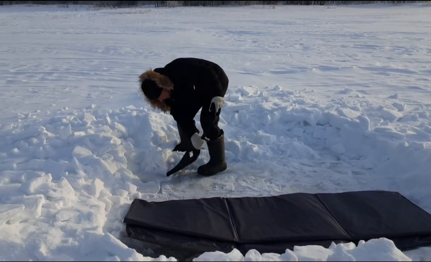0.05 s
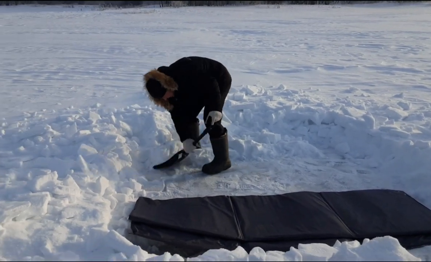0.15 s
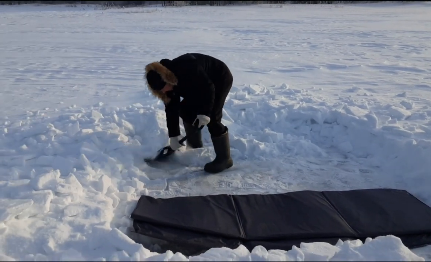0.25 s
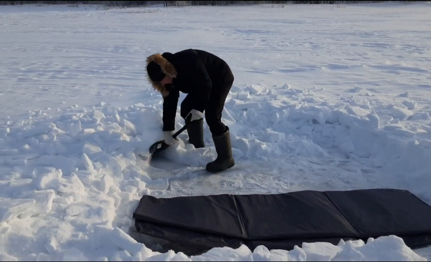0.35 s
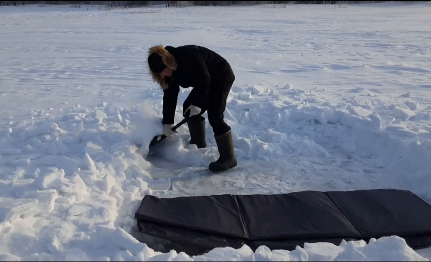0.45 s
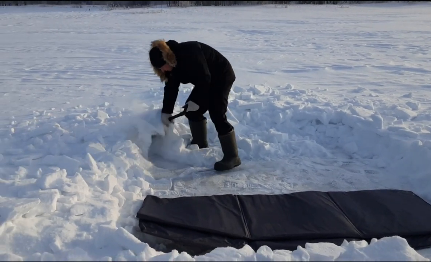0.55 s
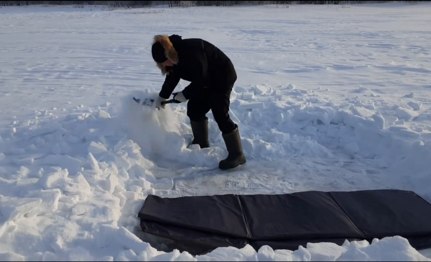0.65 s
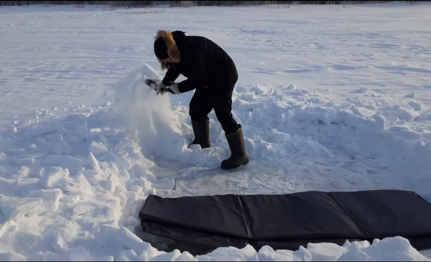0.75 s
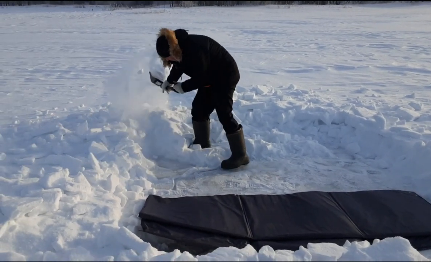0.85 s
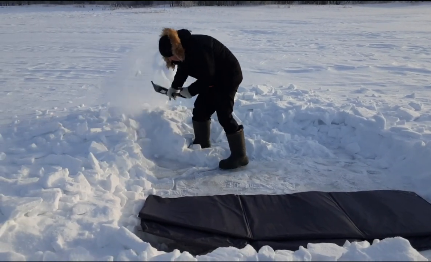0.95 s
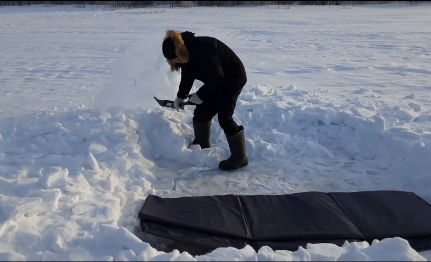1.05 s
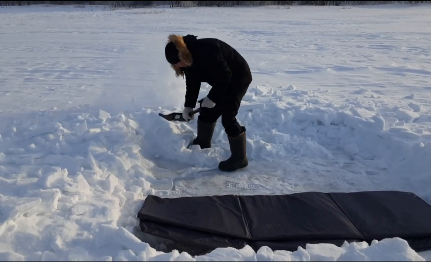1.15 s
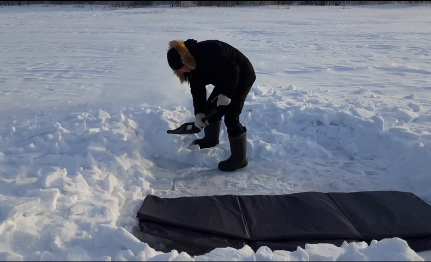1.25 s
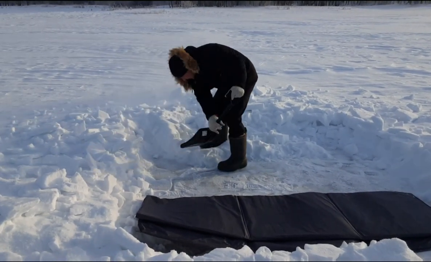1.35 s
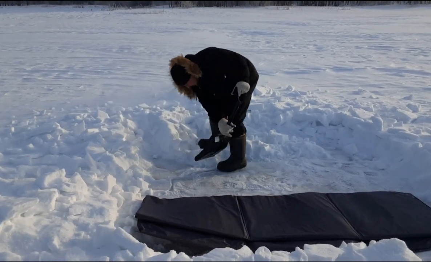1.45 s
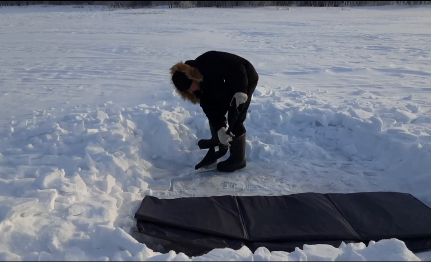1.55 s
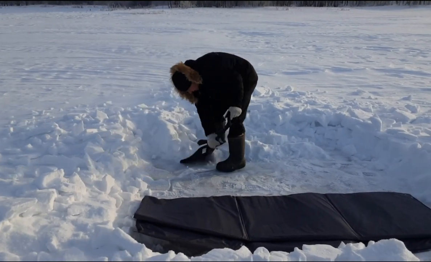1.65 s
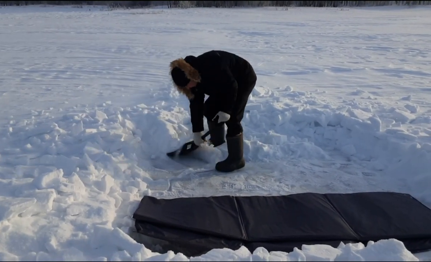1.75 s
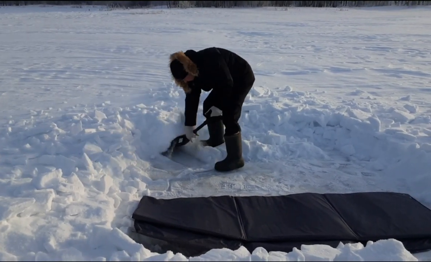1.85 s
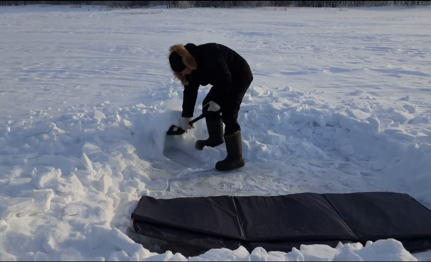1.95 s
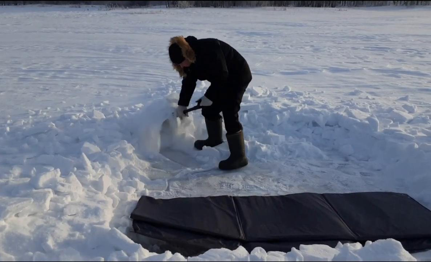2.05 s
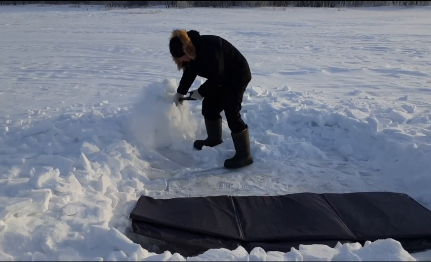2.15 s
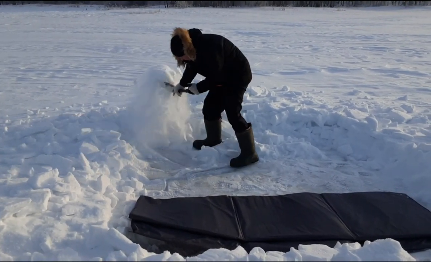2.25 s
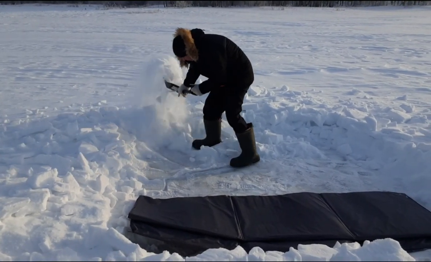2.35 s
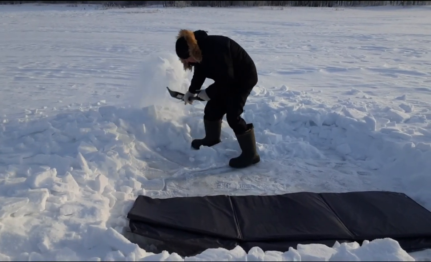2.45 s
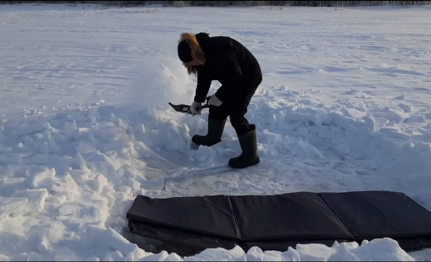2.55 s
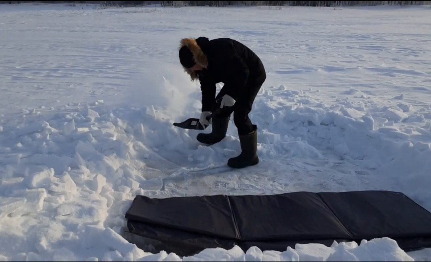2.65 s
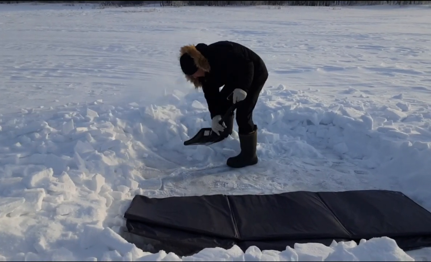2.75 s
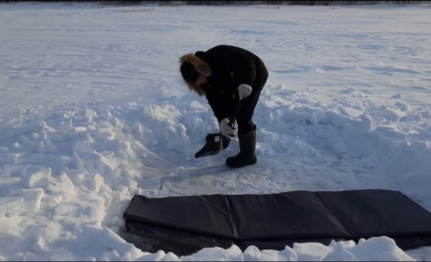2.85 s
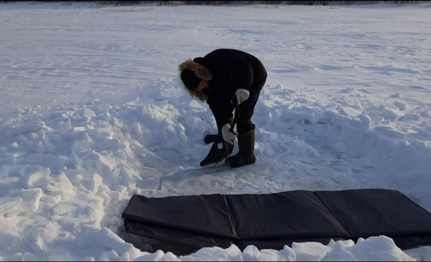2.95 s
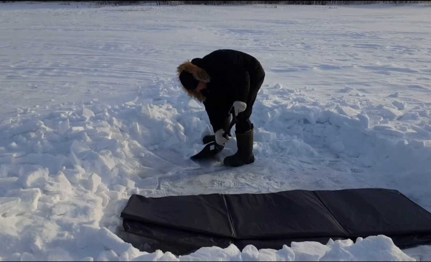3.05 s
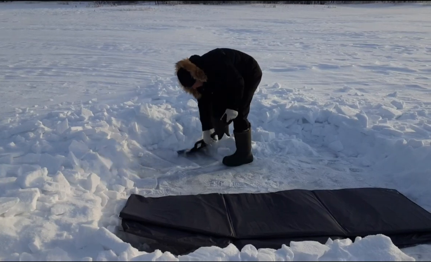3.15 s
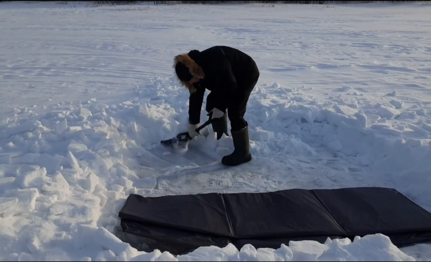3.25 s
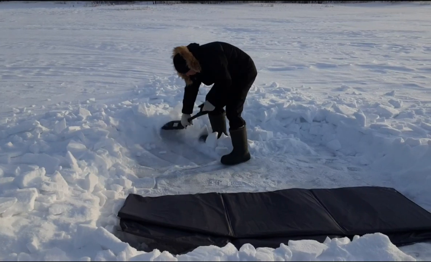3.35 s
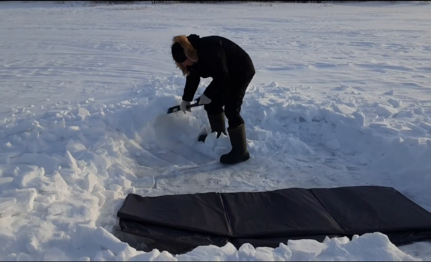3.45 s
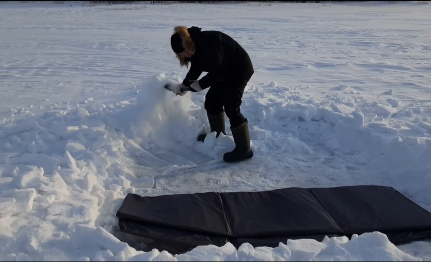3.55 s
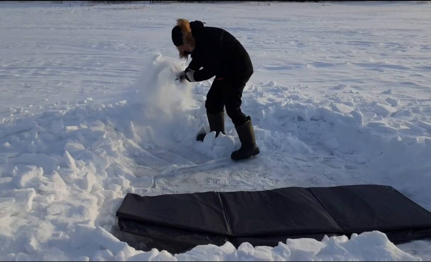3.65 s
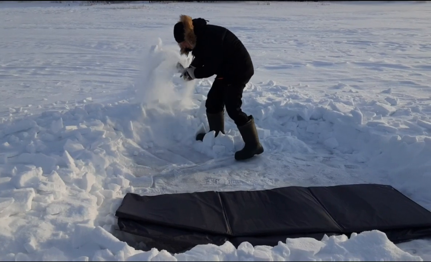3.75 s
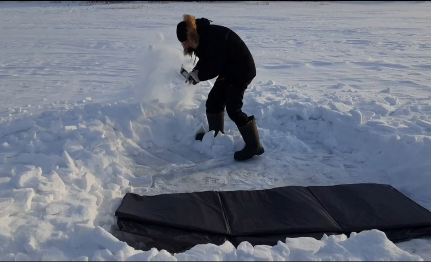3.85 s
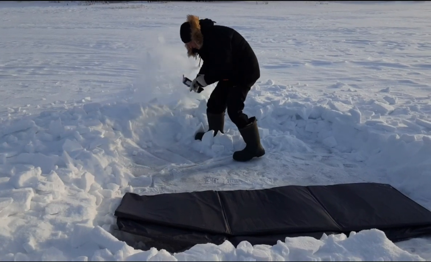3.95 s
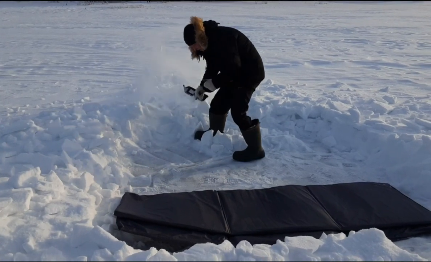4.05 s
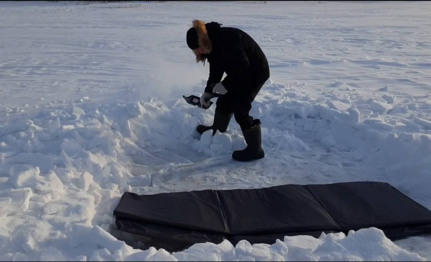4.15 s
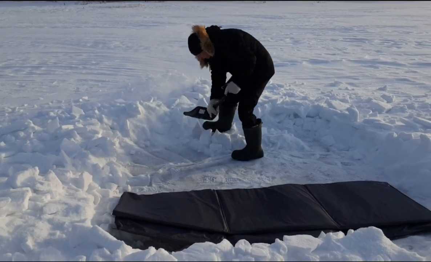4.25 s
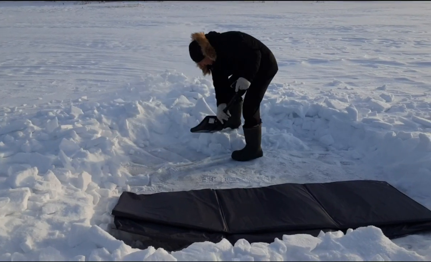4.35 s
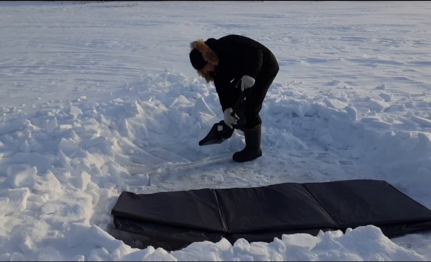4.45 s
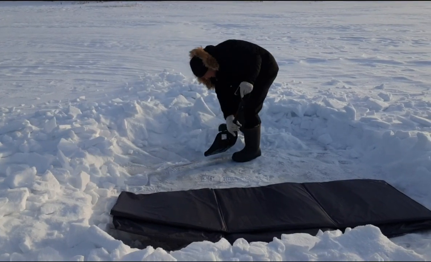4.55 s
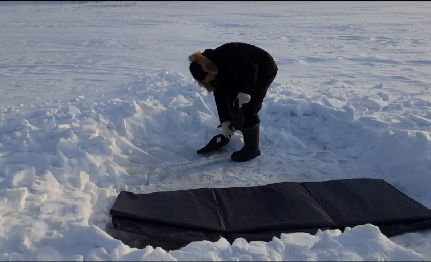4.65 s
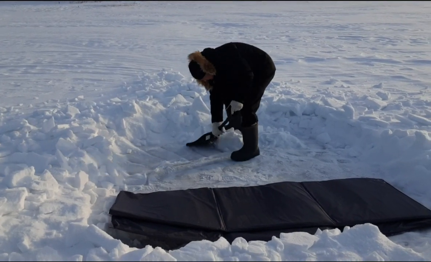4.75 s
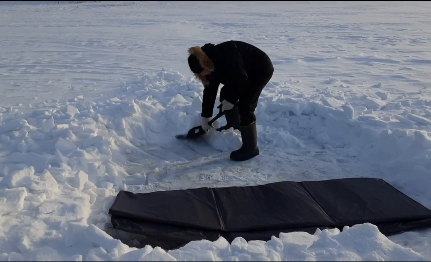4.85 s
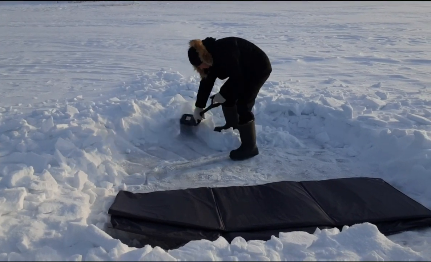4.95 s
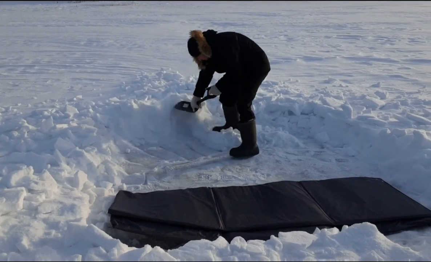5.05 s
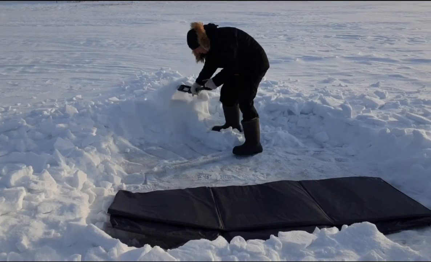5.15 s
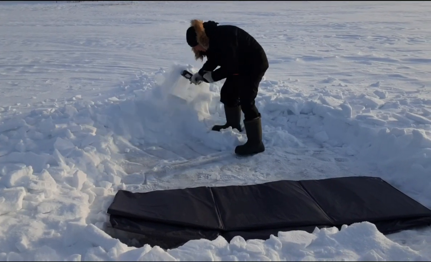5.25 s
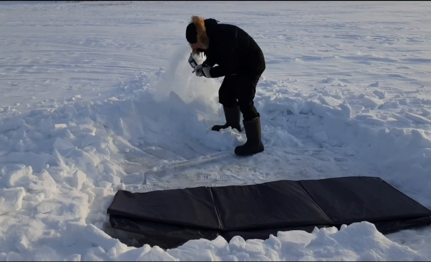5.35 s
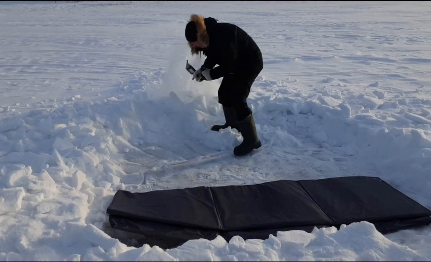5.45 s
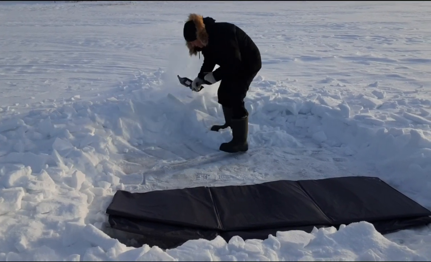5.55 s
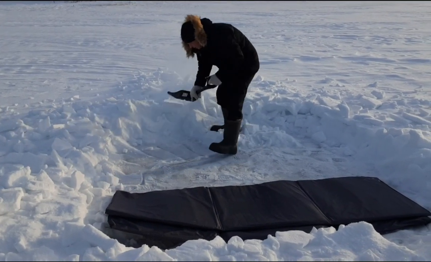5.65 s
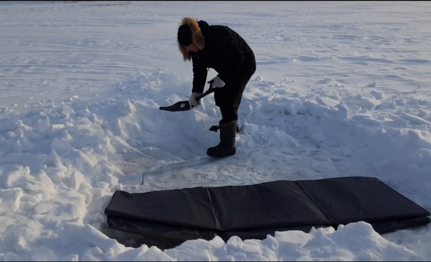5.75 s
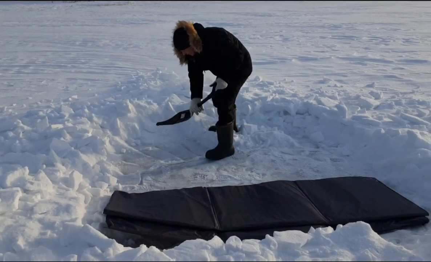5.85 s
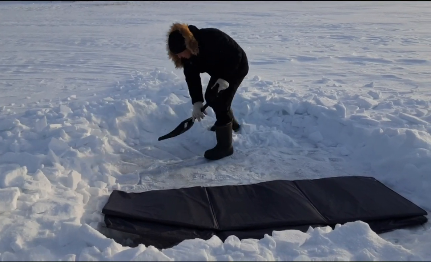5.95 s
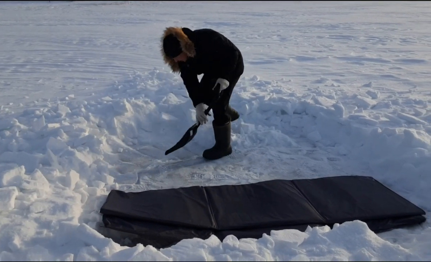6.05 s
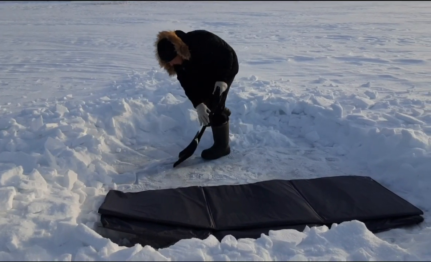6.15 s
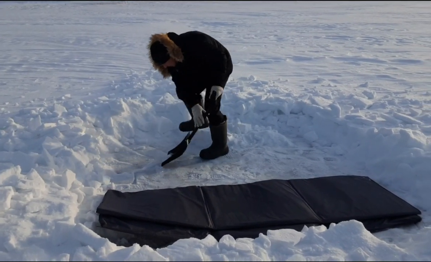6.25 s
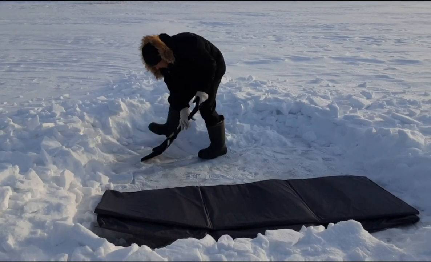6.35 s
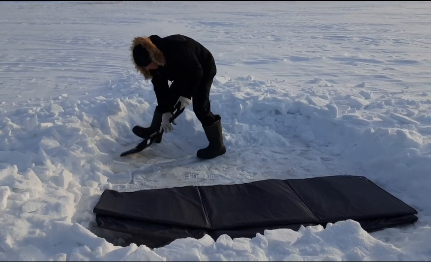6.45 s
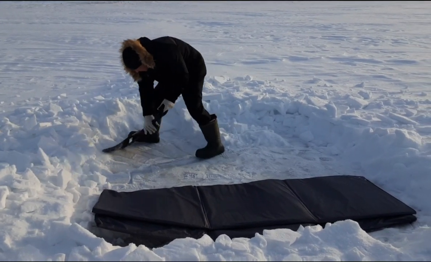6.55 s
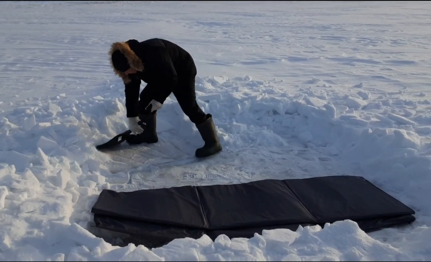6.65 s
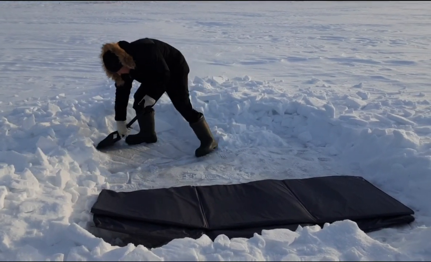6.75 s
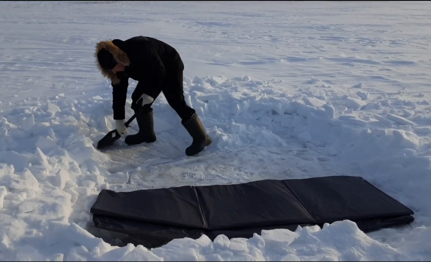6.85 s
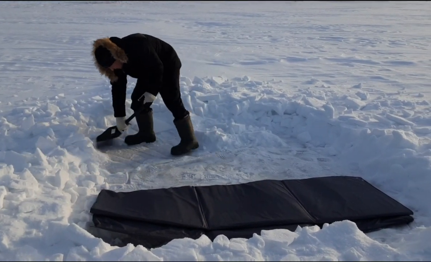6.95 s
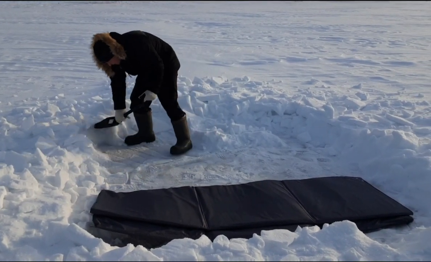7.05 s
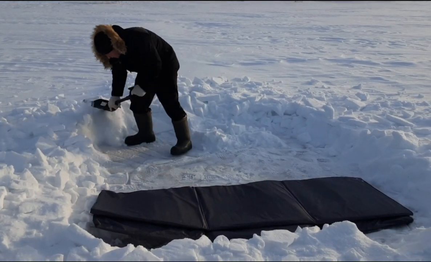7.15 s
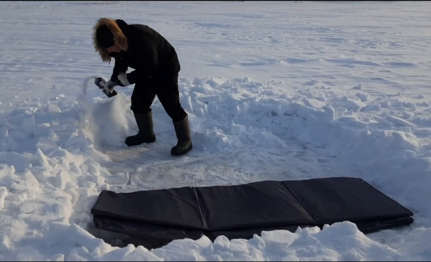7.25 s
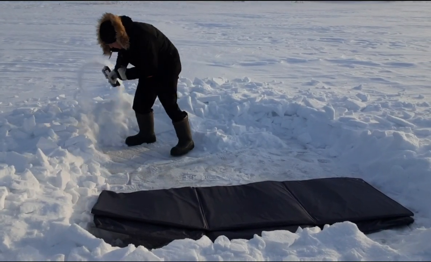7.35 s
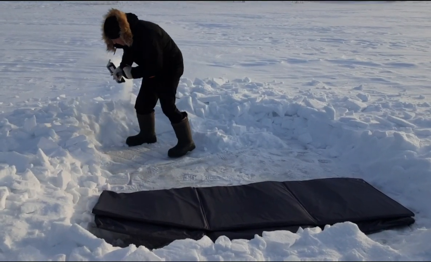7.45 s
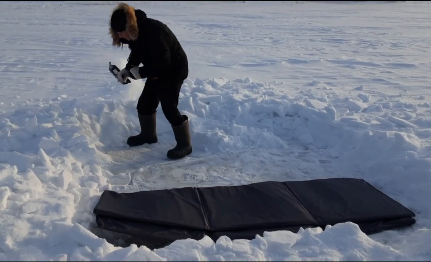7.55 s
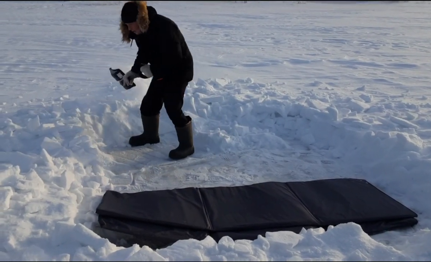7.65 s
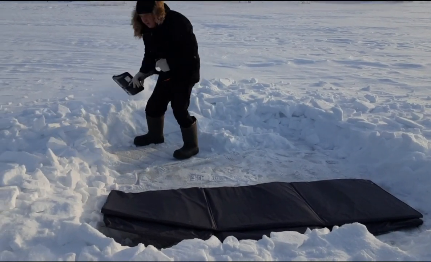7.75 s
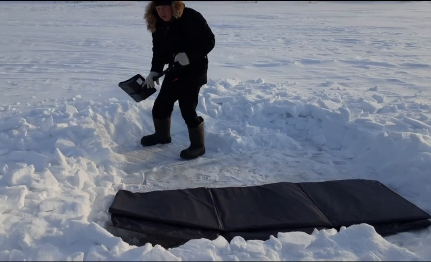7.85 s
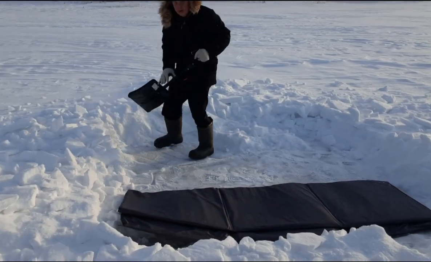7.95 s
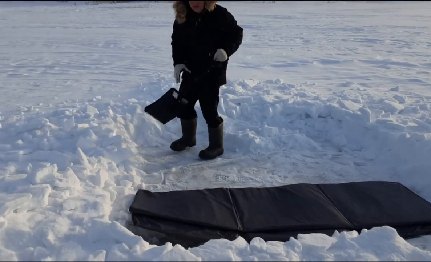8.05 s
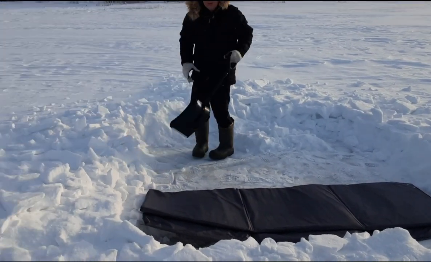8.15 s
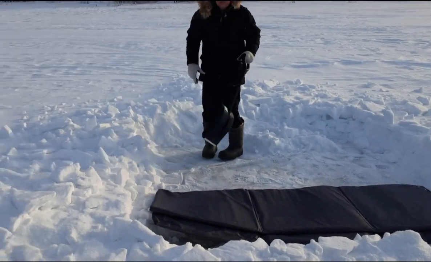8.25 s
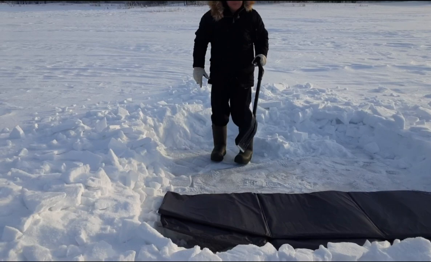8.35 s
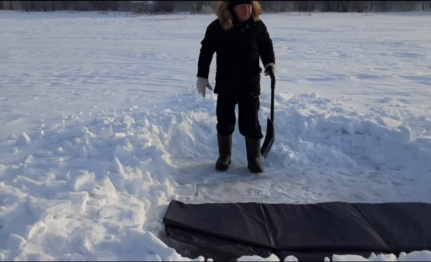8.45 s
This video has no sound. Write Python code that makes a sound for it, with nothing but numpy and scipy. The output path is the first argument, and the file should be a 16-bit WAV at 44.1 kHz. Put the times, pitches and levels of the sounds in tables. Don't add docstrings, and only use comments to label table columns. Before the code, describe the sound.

Outdoors on a snowy frozen lake, a short shovel makes five gritty scraping pushes over packed snow and ice, about one every second and a half. Between them, thrown snow hisses and lands in soft clumps while boots crunch. The last push is longest, starting with loud hard knocks, ringing brighter on bare ice and ending in small squeaks. Quiet crunches follow. One dry microphone, no echo.

```python
import sys
import numpy as np
from scipy import signal
from scipy.fft import rfft, irfft
from scipy.io import wavfile

SR = 44100
rng = np.random.default_rng(int(sys.argv[2]) if len(sys.argv) > 2 else 0)


def bounce(signal):
    frames = np.transpose(np.atleast_2d(signal))
    limited = np.clip(frames, -1, 1)
    pcm = np.round(limited * 32767).astype(np.int16)
    wavfile.write(sys.argv[1], SR, pcm)


def voltage_ratio(decibels):
    exponent = np.asarray(decibels, float) / 20
    return 10 ** exponent


N = 374409

# (time [s], edge pressure [dB], slide speed as spray re pressure [dB])
LOADED_STROKES = [
    [(0.0, -21.5, -3.5), (0.01, -26.5, -3.5), (0.092, -22, -5), (0.165, -29.5, -5.5), (0.246, -33.5, -3),
     (0.262, -30, -4.5), (0.362, -44.5, -3.5), (0.392, -42.5, -0.5), (0.47, -48.5, -5)],
    [(1.433, -49, 1), (1.448, -36.5, 0.5), (1.477, -31, -1), (1.505, -25, -4), (1.619, -28.5, -6),
     (1.635, -33, -0.5), (1.747, -31.5, -7.5), (1.783, -38, -0.5), (1.85, -42.5, -6)],
    [(2.859, -40, 1), (2.872, -25.5, -2.5), (2.89, -33, 0.5), (2.932, -27, -1.5), (2.99, -23.5, -7.5),
     (3.07, -30.5, -5.5), (3.085, -32.5, -6)],
    [(3.085, -38, -6), (3.096, -29.5, -1.5), (3.118, -28.5, -10), (3.13, -32, -3), (3.144, -32.5, -5.5),
     (3.208, -37, 1.5), (3.215, -40, -2), (3.25, -44, -2)],
    [(4.4645, -43, 5), (4.476, -37, 4), (4.482, -22.5, -2.5), (4.516, -32.5, -2), (4.58, -23, -7.5),
     (4.6, -24.5, -3), (4.626, -18.5, -12.5), (4.64, -34, -1)],
    [(4.64, -31, 2.5), (4.684, -31, -1), (4.778, -40.5, -0.5), (4.825, -42, -1.5), (4.84, -38, 2.5),
     (4.9, -41.5, 1.5), (4.94, -37.5, 4.5), (4.98, -46.5, 0)],
]
# (time [s], edge pressure [dB], slide speed as spray re pressure [dB])
BARE_STROKES = [
    [(6.034, -28.5, -14), (6.056, -32.5, -17), (6.07, -39, -11), (6.11, -31, -14), (6.122, -31.5, -8),
     (6.148, -29, -20), (6.214, -36, -4.5), (6.25, -25.5, -10), (6.264, -32, -16)],
    [(6.264, -29, -13), (6.306, -28, -10), (6.412, -28, -9), (6.43, -32, -5), (6.488, -29.5, 0),
     (6.55, -30.5, -5), (6.58, -25.5, -6.5), (6.606, -36.5, -1), (6.63, -33.5, -7)],
    [(6.63, -45, -5), (6.648, -36, -8), (6.72, -37.5, -8), (6.758, -47, -2), (6.856, -39, 1),
     (6.894, -40, -1), (6.924, -34, -6), (6.942, -46.5, 5.5), (7.004, -50, 3.5)],
]
# (shaft and ice boom at full pressure [dB], low blade modes re ring [dB])
GRIPS = [
    (-37.5, -5.5),
    (-37, -2.5),
    (-36, -2.5),
    (-38.5, -2),
    (-31, -2),
    (-33, -1.5),
    (-36, -2),
    (-35, -1),
    (-37.5, -1.5),
]
# (time [s], upper mode pitch ratio [1], low mode pitch ratio [1])
FLEX = [
    (0.0, 0.98, 1.026),
    (6.029, 1.01, 1.023),
    (6.13, 0.97, 1.086),
    (6.22, 1.02, 0.91),
    (6.339, 0.94, 0.93),
    (6.44, 1.06, 0.93),
    (6.51, 0.98, 0.99),
    (6.6, 0.97, 0.89),
    (7.0, 1.02, 1.01),
]
# (frequency [Hz], width [Hz], level [dB])
LOADED_MODES = [(504, 168, -1.5), (603, 313, -2), (880, 200, -0.5), (1050, 223, -4.5), (1238, 210, -4),
                (1540, 245, -3), (1830, 155, -2), (2414, 280, -4.5), (3020, 264, -7.5), (3410, 500, -17)]
# (frequency [Hz], width [Hz], level [dB])
BARE_MODES = [(620, 270, -7), (836, 190, -3.5), (1040, 200, -0.5), (1510, 280, 2), (2440, 194, 3.5),
              (3060, 920, -9)]
# (frequency [Hz], density [dB per Hz])
LOADED_SPRAY = [(2060, -35), (3500, -3), (3970, -7), (4440, -1.5), (5040, -9), (5470, -5), (6200, -5.5),
                (6730, -0.5), (7340, -2), (9500, -1.5), (11100, -16.5), (15700, -14)]
# (frequency [Hz], density [dB per Hz])
BARE_SPRAY = [(1940, -14), (3300, -1), (3640, -8), (3940, -14), (4630, -2), (5140, -18), (6420, -6),
              (7040, -6.5), (9560, 1), (11000, -13.5), (12600, -10), (15700, -16)]
# (frequency [Hz], density [dB per Hz])
BOOM = [(30, -29), (57, -12.5), (107, -6.5), (200, 2.5), (312, -5), (347, -8.5), (500, -7), (650, -43),
        (1100, -120)]
HISS_PARTS_HZ = [1500, 5100, 7200, 10600, 17000]
# (time [s], pitch [Hz], level [dB])
SQUEAKS = [
    [(6.631, 1122, -36), (6.636, 1195, -25), (6.65, 1226, -25), (6.67, 1370, -32), (6.695, 1266, -29),
     (6.722, 1140, -45), (6.735, 961, -51)],
    [(6.858, 747, -31), (6.864, 880, -30), (6.875, 1008, -32), (6.892, 1092, -41), (6.908, 1274, -37),
     (6.915, 1664, -32), (6.93, 1809, -36)],
]
# (time [s], peak [dB])
KNOCKS = [
    (2.866, -27),
    (4.476, -21),
    (4.621, -12),
    (6.036, -9.5),
    (6.042, -3),
    (6.251, -8),
    (6.297, -4.5),
    (7.024, -24),
]
# (frequency [Hz], level [dB], t60 [s])
KNOCK_MODES = [(505, -12.5, 0.072), (1050, 8, 0.024), (1600, -7, 0.043), (2276, -12, 0.063)]
# (start [s], attack [s], hold [s], release [s], crunch [dB])
CRUNCHES = [(0.49, 0.045, 0.21, 0.17, -51.5), (0.915, 0.032, 0.03, 0.03, -39),
            (0.94, 0.04, 0.053, 0.039, -36), (1.06, .01, 0.064, 0.36, -51), (1.3, 0.016, 0.13, 0.15, -57.5),
            (1.84, 0.058, 0.12, 0.07, -44), (2.05, 0.014, 0.054, 0.26, -45), (2.29, .008, .06, .03, -45),
            (2.3, 0.068, 0.067, 0.033, -36.5), (2.45, .005, 0.051, .05, -52.5),
            (2.5, 0.023, 0.094, 0.17, -49.5), (2.69, .005, 0.18, .03, -57),
            (3.255, 0.0097, 0.088, 0.015, -47.5), (3.35, 0.013, 0.062, 0.028, -43.5),
            (3.44, 0.061, 0.071, 0.54, -49), (3.7, 0.16, 0.06, 0.08, -41), (4.0, .01, 0.13, .05, -58),
            (4.195, 0.0085, 0.17, 0.03, -45), (4.37, 0.0075, 0.039, 0.061, -59),
            (5.0, 0.025, 0.1, 0.011, -44), (5.13, 0.013, 0.16, 0.2, -54.5), (5.5, 0.037, 0.15, 0.18, -40.5),
            (7.02, 0.0078, 0.0084, 0.054, -35), (7.06, 0.016, 0.3, 0.15, -49.5),
            (7.35, 0.019, 0.042, 0.03, -44), (7.41, .01, 0.14, 0.26, -50.5),
            (8.018, 0.004, 0.011, 0.24, -49.5), (8.04, 0.011, 0.046, .02, -51),
            (8.128, 0.0044, 0.028, 0.18, -48), (8.21, .01, 0.12, 0.41, -55)]
# (start [s], attack [s], hold [s], release [s], hiss [dB])
POWDERS = [(0.46, 0.014, 0.045, 0.29, -53.5), (0.535, 0.05, 0.11, 0.1, -48),
           (0.68, 0.066, 0.0084, 0.014, -45), (0.76, .01, 0.092, 0.33, -60),
           (0.9, 0.15, 0.19, 0.018, -47.5), (1.25, 0.0054, 0.2, 0.56, -54.5),
           (1.85, 0.0092, 0.16, 0.17, -49.5), (2.06, 0.0056, 0.12, 0.42, -48.5),
           (2.3, 0.13, 0.02, 0.063, -47.5), (2.48, 0.02, 0.13, 0.098, -46.5), (2.52, 0.014, .01, .04, -45),
           (2.69, .004, 0.011, 0.042, -44.5), (2.738, 0.004, 0.01, 0.33, -51),
           (3.25, 0.0096, .01, 0.1, -37.5), (3.27, .01, .055, .012, -42), (3.3, 0.022, 0.34, 0.74, -49.5),
           (3.85, 0.068, 0.043, 0.34, -47), (4.195, 0.011, 0.032, 0.13, -48),
           (4.25, 0.055, 0.049, 0.044, -44.5), (4.96, 0.074, 0.036, 0.084, -44.5),
           (5.14, 0.02, 0.12, 0.23, -48.5), (5.45, 0.021, 0.21, 0.68, -54), (5.8, .015, .015, 0.036, -54),
           (7.02, 0.004, 0.0047, 0.04, -36), (7.05, 0.014, 0.08, 0.068, -51.5),
           (7.15, 0.078, 0.13, 0.2, -52.5), (7.35, 0.011, 0.035, 0.03, -45), (7.41, .01, 0.19, 0.31, -53.5),
           (8.018, 0.0036, 0.01, 0.1, -50.5), (8.04, 0.012, 0.04, .02, -57),
           (8.128, 0.0036, 0.041, 0.2, -54), (8.25, 0.045, .2, .5, -61)]
# (start [s], hold [s], release [s], rumble [dB])
TREADS = [(0.54, 0.19, 0.046, -49.5), (0.83, 0.068, .05, -49.5), (0.98, 0.27, 0.097, -47.5),
          (1.26, 0.022, 0.25, -42), (1.83, 1, 0.37, -52), (2.5, 0.1, 0.6, -44.5), (3.23, 0.58, 0.25, -48.5),
          (3.9, 0.035, 0.84, -45.5), (4.28, 0.047, 0.11, -42.5), (5.0, 0.058, 0.077, -33.5),
          (5.22, 0.047, 0.4, -55), (5.48, 0.31, 0.19, -43.5), (6.99, 0.018, 0.39, -44.5),
          (7.35, 0.33, 0.24, -51), (7.99, 0.78, 0.93, -50.5)]
# (frequency [Hz], density [dB per Hz])
CRUNCH = [(220, -36.5), (400, -13.5), (800, -12), (1300, -5), (1800, -9.5), (2300, -21), (2900, -17.5),
          (4730, -120)]
CRUNCH_PARTS_HZ = [150, 750, 1250, 1700, 4000]
# (frequency [Hz], density [dB per Hz])
POWDER = [(2180, -51), (3700, -8.5), (4360, 0.5), (5380, -0.5), (5890, 5), (7740, 3.5), (9390, 6.5),
          (11200, -6.5), (15700, -4)]
# (frequency [Hz], density [dB per Hz])
RUMBLE = [(25, -49), (56, -6), (134, -5), (213, -2), (281, -9), (314, -5), (343, -16.5), (500, -12.5),
          (650, -15.5), (1100, -120)]
# (frequency [Hz], width [Hz], level [dB])
GRIT = [(2370, 320, 10), (3060, 1540, 1)]
# (peak time [s], peak [dB], pitch [Hz])
THUDS = [(0.982, -30, 214), (1.126, -25, 169), (1.296, -28, 168), (1.317, -19.5, 240), (1.338, -29, 270),
         (2.099, -34.5, 194), (2.545, -22.5, 206), (2.594, -21.5, 192), (2.637, -24, 206),
         (2.87, -15.5, 171), (3.391, -29, 170), (3.52, -33, 174), (3.658, -32.5, 172), (3.973, -30, 146),
         (3.994, -32, 167), (4.374, -47, 181), (4.496, -24, 179), (4.616, -13.5, 209), (4.84, -27, 143),
         (4.867, -28, 156), (4.938, -23.5, 142), (5.04, -40, 190), (5.062, -42, 200), (5.256, -38, 181),
         (5.513, -36, 275), (5.615, -20.5, 106), (5.706, -26, 74.4), (5.756, -28.5, 268),
         (5.791, -29.5, 188), (6.046, -12, 225), (6.053, -16.5, 189), (6.298, -19, 220),
         (7.028, -24.5, 160), (7.439, -36, 168), (8.036, -35, 105)]
# (peak time [s], peak [dB])
JOLTS = [(0.149, -25), (0.296, -24), (0.314, -28), (0.446, -34.5), (1.453, -29), (1.514, -23), (1.598, -25),
         (1.776, -34), (1.828, -35), (3.023, -22.5), (3.072, -24), (3.208, -28.5), (3.23, -32),
         (4.601, -17), (4.686, -35), (6.157, -35), (6.256, -29), (6.384, -36), (6.395, -20.5), (6.407, -26),
         (6.495, -28)]
# (time [s], peak [dB], bright part re peak [dB], piece pitch [Hz])
TICKS = [(0.807, -29, -22, 700), (0.831, -31.5, -27, 1300), (0.908, -29.5, -26, 700),
         (1.069, -22, -31, 1000), (1.128, -16, -26, 1210), (3.915, -28, -17, 1050), (3.958, -20, -24, 1250),
         (3.99, -20.5, -24, 1280), (4.369, -25, -28, 560), (5.441, -31.5, -18, 580), (5.457, -34, -24, 608),
         (5.485, -25.5, -21, 596), (5.509, -24, -26, 730), (5.754, -19, -21, 1400), (5.778, -26, -19, 1400),
         (5.819, -21, -22, 1360), (6.632, -27, -25, 800), (6.738, -21, -14, 2350), (6.858, -23, -21, 800.5),
         (7.878, -29.5, -14.5, 2520), (8.396, -34, -10, 930)]
# (time [s], peak [dB], bright part re peak [dB], piece pitch [Hz])
SNAPS = [(1.083, -26, -27, 1260), (1.147, -28, -1.5, 1360), (1.237, -30, -4, 1680), (2.095, -24, -24, 2150),
         (2.692, -23.5, -8, 1310), (3.257, -23, -14, 2200), (3.613, -26, -5, 1770), (4.465, -24, -23, 1730),
         (4.83, -31, -9, 1850), (5.54, -17.5, -24, 2190), (5.703, -20.5, -19, 1260),
         (7.367, -26, -19, 1660), (7.578, -40, 4, 1860), (8.021, -25.5, -10, 1890), (8.134, -29, -17, 1450),
         (8.21, -29, -13, 1210)]
# (time [s], peak [dB], pitch [Hz])
POPS = [(0.3573, -28, 8690), (0.5638, -40, 4170), (0.603, -32, 8920), (0.7535, -31, 8880),
        (0.848, -49, 700), (0.872, -55, 700), (0.887, -48, 950), (1.1497, -35, 1990), (1.1592, -40, 4530),
        (1.2378, -29, 8360), (1.8504, -36, 960), (2.415, -27, 1400), (2.619, -39, 1300),
        (2.5896, -31, 7690), (2.7041, -45, 9270), (2.7429, -37, 8150), (3.6123, -34, 1840),
        (3.618, -45, 3600), (3.889, -35, 1200), (3.916, -28.5, 7290), (3.9275, -27, 7860),
        (3.941, -39, 1200), (4.098, -47, 1500), (4.1451, -50, 1900), (4.2795, -37, 6900),
        (4.2885, -31, 8520), (4.3138, -30, 8410), (5.1288, -41, 2740), (5.2434, -35, 5600),
        (5.31, -42, 4960), (5.3497, -33, 8220), (5.3796, -41, 8770), (5.599, -43, 550), (5.7901, -37, 8080),
        (5.812, -40, 7640), (5.8294, -39, 8370), (5.8475, -50, 4740), (7.0324, -33, 8290),
        (7.162, -39, 3450), (7.1797, -42, 1200), (7.2045, -39.5, 1990), (7.287, -53, 1200),
        (7.335, -37, 1190), (7.42, -46, 1100), (7.426, -40, 900), (7.453, -45, 1200), (7.579, -39, 7880),
        (7.5845, -39, 8530), (7.6508, -41, 1900), (7.684, -42, 4100), (7.7562, -42, 8940),
        (7.787, -42, 8950), (7.8371, -53, 8900), (7.9496, -50, 8000), (7.9921, -56, 8500),
        (8.0952, -42, 8560), (8.1305, -43, 8730), (8.2203, -46, 8610)]
# (frequency [Hz], density [dB per Hz])
AIR = [(25, -7), (152, 3), (485, -15), (1400, -29.5), (2720, -45), (3560, -61), (9410, -49), (15700, -29)]

BARE_ICE_S = 6.0
LOADED_BELOW_HZ = 1150
FULL_PRESSURE_DB, BOOM_PER_PRESSURE_DB = -28.5, 0.63
WANDER_S, WANDER_PER_S = 0.000388, 4.84
SHAFT_HZ = 200
SWELL_FALL_DB = 17.5
TREAD_ATTACK_S = 0.026
GRIT_RE_CRUNCH_DB, GRIT_RE_POWDER_DB, POWDER_RE_CRUNCH_DB = -15, -8, -26
POP_CYCLES, POP_GAIN_DB = 0.97, 11
AIR_DB = -54
HUM_HZ, HUM_WIDTH_HZ, HUM_DB = 315.3, 10, -62.5
POP_ROLL_OFF_HZ, TOP_CUT_HZ = 10000, 15800


def rms_one(x):
    return x / np.sqrt(np.mean(x ** 2) + 1e-20)


def add(out, s, sound):
    at = round(s * SR)
    out[at:at + len(sound)] += sound[:N - at]


def drift(rate_hz):
    r = np.exp(-64 * np.pi * rate_hz / SR)
    draws = rng.standard_normal(N // 32 + 2002)
    slow = signal.lfilter([1], [1, -2 * r, r * r], draws)[2000:]
    return np.interp(np.arange(N) / 32, np.arange(len(slow)), rms_one(slow))


def grains(per_s, spread_db, clump_db, clump_hz):
    sizes = voltage_ratio(spread_db * np.minimum(rng.exponential(1, N), 5)) * rng.choice([-1, 1], N)
    born = rng.random(N) < per_s / SR
    train = sizes * born + 0.23 * rng.standard_normal(N)
    return rms_one(train * voltage_ratio(clump_db * drift(clump_hz)))


def colour(x, spectrum):
    hz, level_db = np.transpose(spectrum)
    size = 8192
    grid_hz = np.maximum(np.arange(size // 2 + 1) * SR / size, 1)
    grid_db = np.interp(np.log(grid_hz), np.log(hz), np.maximum(level_db, -60))
    cepstrum = irfft(np.log(voltage_ratio(grid_db)))
    cepstrum[1:size // 2] *= 2
    cepstrum[size // 2 + 1:] = 0
    response = irfft(np.exp(rfft(cepstrum)))
    return signal.fftconvolve(x, response)[:N]


def resonance(x, hz, width_hz):
    r = np.exp(-np.pi * width_hz / SR)
    poles = [1, -2 * r * np.cos(2 * np.pi * hz / SR), r * r]
    return signal.lfilter([(1 - r * r) / 2, 0, (r * r - 1) / 2], poles, x)


def body(x, modes, uneven_db):
    total = np.zeros(N)
    for k, (hz, width_hz, db) in enumerate(modes):
        drive = x * voltage_ratio(uneven_db * drift(19.7))
        total += voltage_ratio(db) * (-1) ** k * resonance(drive, hz, width_hz)
    return rms_one(total)


def patchy(x, edges_hz, patch_db):
    total = np.zeros(N)
    for k, band_hz in enumerate(zip(edges_hz, edges_hz[1:])):
        part = signal.sosfilt(signal.butter(2, band_hz, "band", fs=SR, output="sos"), x)
        total += (-1) ** k * part * voltage_ratio(patch_db * drift(4.0))
    return rms_one(total)


def scrape():
    ring, boom, spray, load = stroke_gains(fade_s=0.061)
    loaded = np.arange(N) < BARE_ICE_S * SR
    contacts = grains(4000, spread_db=2.0, clump_db=-0.3, clump_hz=59.7)
    upper = blade_modes(contacts, loaded, high=True)
    lower = blade_modes(contacts, loaded, high=False)
    shaft = colour(grains(600, spread_db=2.5, clump_db=1.0, clump_hz=35.6), BOOM)
    chips = contacts + 1.23 * grains(5000, spread_db=1.0, clump_db=2.0, clump_hz=30)
    chips = patchy(chips, HISS_PARTS_HZ, patch_db=3.0)
    bright = np.where(loaded, rms_one(colour(chips, LOADED_SPRAY)), rms_one(colour(chips, BARE_SPRAY)))
    s, upper_ratio, lower_ratio = np.transpose(FLEX)
    t = np.arange(N) / SR
    upper = bend(upper, np.interp(t, s, upper_ratio))
    lower = bend(lower, np.interp(t, s, lower_ratio))
    return ring * upper + load * lower + boom * rms_one(shaft) + spray * bright


def stroke_gains(fade_s):
    t, gains = np.arange(N) / SR, np.zeros((4, N))
    for rows, (boom_db, low_db) in zip(LOADED_STROKES + BARE_STROKES, GRIPS):
        s, pressure_db, speed_db = np.transpose(rows)
        fade_in = np.clip((t - s[0]) * 1000 + 1, 0, 1)
        fade_out = np.clip((s[-1] - t) / fade_s + 1, 0, 1)
        shaft_db = boom_db + BOOM_PER_PRESSURE_DB * (pressure_db - FULL_PRESSURE_DB)
        levels_db = pressure_db, shaft_db, pressure_db + speed_db, pressure_db + low_db
        curves = voltage_ratio([np.interp(t, s, db) for db in levels_db])
        gains = np.maximum(gains, fade_in * fade_out * curves)
    return gains


def blade_modes(contacts, loaded, high):
    rings = []
    for modes in (LOADED_MODES, BARE_MODES):
        chosen = [mode for mode in modes if (mode[0] > LOADED_BELOW_HZ) == high]
        rings.append(body(contacts, chosen, uneven_db=2.5))
    return np.where(loaded, *rings)


def bend(x, ratio):
    at = np.cumsum(ratio * np.ones(N)) + WANDER_S * SR * drift(WANDER_PER_S)
    return np.interp(at, np.arange(N), x)


def squeaks():
    out, t = np.zeros(N), np.arange(N) / SR
    waver, flutter = 1 + 0.012 * drift(100), voltage_ratio(2.5 * drift(100))
    for rows in SQUEAKS:
        s, hz, level_db = np.transpose(rows)
        phase = 2 * np.pi * np.cumsum(np.interp(t, s, hz) * waver) / SR
        gain = voltage_ratio(np.interp(t, s, level_db, -150, -150) - 1.5)
        out += gain * (np.sin(phase) + 0.04 * np.sin(2 * phase))
    return out * flutter


def knocks():
    out, t = np.zeros(N), np.arange(SR // 5) / SR
    strength_db = rng.normal(0, 3, (len(KNOCKS), len(KNOCK_MODES)))
    for (s, peak_db), own_db in zip(KNOCKS, strength_db):
        modes = np.zeros(len(t))
        for (hz, db, t60_s), own in zip(KNOCK_MODES, own_db):
            modes += voltage_ratio(db + own - 60 * t / t60_s) * np.sin(2 * np.pi * hz * t)
        modes *= 1 - np.exp(-t / 0.00077)
        crack = colour(rng.standard_normal(len(t)) * voltage_ratio(-60 * t / 0.033), LOADED_SPRAY)[:len(t)]
        add(out, s, voltage_ratio(peak_db - 8.5) * (modes / np.max(np.abs(modes)) + voltage_ratio(-13.0) * crack))
    return out


def loose_snow():
    crunch, sift = swells(CRUNCHES), swells(POWDERS)
    rumble = swells(np.insert(TREADS, 1, TREAD_ATTACK_S, axis=1))
    powder = sift + voltage_ratio(POWDER_RE_CRUNCH_DB) * crunch
    grit = voltage_ratio(GRIT_RE_CRUNCH_DB) * crunch + voltage_ratio(GRIT_RE_POWDER_DB) * sift
    breaks = grains(2200, spread_db=2.5, clump_db=-1.5, clump_hz=37.8)
    fine = breaks + 0.91 * grains(9700, spread_db=-0.5, clump_db=2.5, clump_hz=27.0)
    low = grains(700, spread_db=3.0, clump_db=4.0, clump_hz=7.9)
    out = crunch * rms_one(colour(patchy(breaks, CRUNCH_PARTS_HZ, patch_db=1.2), CRUNCH))
    out += rumble * rms_one(colour(low, RUMBLE))
    out += powder * rms_one(colour(patchy(fine, HISS_PARTS_HZ, patch_db=-0.5), POWDER))
    return out + grit * body(fine, GRIT, uneven_db=2.5)


def swells(rows):
    t = np.arange(0, N / SR + 0.01, 0.001)[:, None]
    start, attack, hold, release, level_db = np.transpose(rows)
    before = (start + attack - t) / np.maximum(attack, 0.001)
    after = (t - start - attack - hold) / np.maximum(release, 0.001)
    away = np.maximum(np.maximum(before, after), 0)
    power = np.sum((t >= start) * voltage_ratio(2 * (level_db - SWELL_FALL_DB * away)), axis=1)
    return np.interp(np.arange(N) / SR, t[:, 0], np.sqrt(power))


def thuds():
    out, t = np.zeros(N), np.arange(SR // 4) / SR
    for s, peak_db, hz in THUDS + [(s, db, SHAFT_HZ) for s, db in JOLTS]:
        cycles = t * hz
        swing = cycles / 0.81 * np.exp(1 - cycles / 0.63)
        add(out, s - 0.668 / hz, voltage_ratio(peak_db + 0.5) * swing * np.sin(2 * np.pi * cycles))
    return out


def snaps(events, rise_s, t60_s):
    out, bright, t = np.zeros(N), np.zeros(N), np.arange(SR // 8) / SR
    envelope = (1 - np.exp(-t / rise_s)) * voltage_ratio(-60 * t / t60_s)
    bursts = rng.standard_normal((len(events), len(t))) * envelope
    for (s, peak_db, bright_db, hz), burst in zip(events, bursts):
        piece = resonance(resonance(burst, hz, 0.44 * hz), hz, 0.44 * hz)
        crust = resonance(resonance(burst, 820, 1360), 820, 1360)
        dull = piece / np.max(np.abs(piece)) + 1.04 * crust / np.max(np.abs(crust))
        add(out, s, voltage_ratio(peak_db - 10.5) * dull)
        add(bright, s, burst * voltage_ratio(peak_db + bright_db))
    return out + voltage_ratio(3) * colour(bright, POWDER)


def pops():
    out, t = np.zeros(N), np.arange(SR // 100) / SR
    for s, peak_db, hz in POPS:
        cycles = t * hz
        pulse = np.exp(-cycles / POP_CYCLES) * np.sin(2 * np.pi * cycles)
        add(out, s - 0.5 / hz, voltage_ratio(peak_db + POP_GAIN_DB) * pulse)
    return signal.lfilter(*signal.butter(2, POP_ROLL_OFF_HZ, fs=SR), out)


def air():
    hush = rms_one(colour(rng.standard_normal(N), AIR)) * voltage_ratio(2.4 * drift(3.5))
    hum = rms_one(resonance(rng.standard_normal(N), HUM_HZ, HUM_WIDTH_HZ)) * voltage_ratio(2.5 * drift(1.5))
    return voltage_ratio(AIR_DB) * hush + voltage_ratio(HUM_DB) * hum


def scene():
    crust = snaps(TICKS, rise_s=0.00017, t60_s=0.013) + snaps(SNAPS, rise_s=0.0058, t60_s=0.041)
    return (scrape() + squeaks() + knocks() + loose_snow() + thuds() + crust + pops() + air())[None]


def top_cut(x):
    return signal.sosfilt(signal.butter(12, 16920, fs=SR, output="sos"), x)


def record(dry):
    x = 0.64 * np.tanh(dry / 0.76)
    x = signal.sosfilt(signal.butter(3, 45, "high", fs=SR, output="sos"), x)
    x = signal.sosfilt(signal.ellip(12, 0.5, 80, TOP_CUT_HZ, fs=SR, output="sos"), x)
    return top_cut(x)


dry = scene()
out = record(dry)
bounce(out)
```